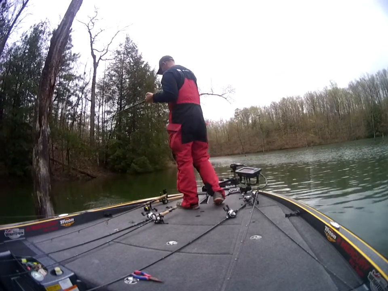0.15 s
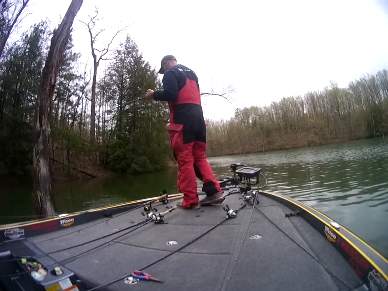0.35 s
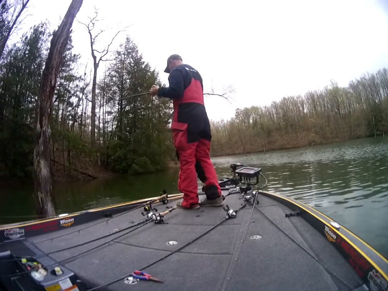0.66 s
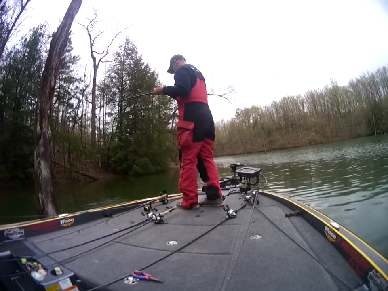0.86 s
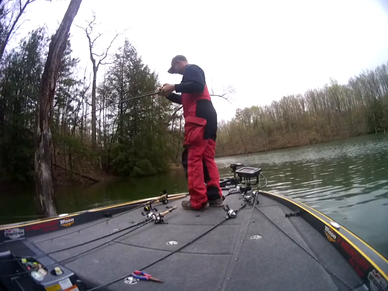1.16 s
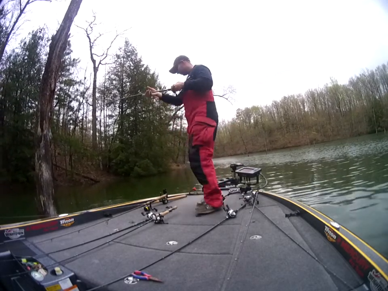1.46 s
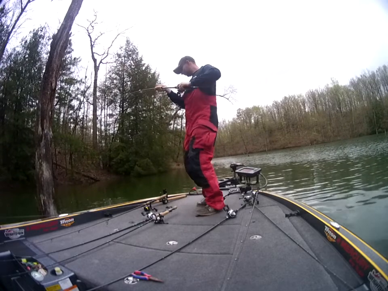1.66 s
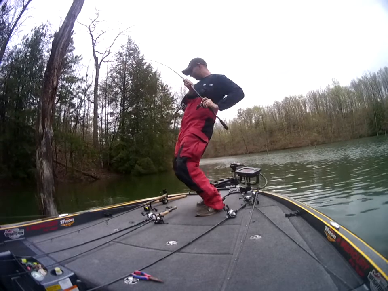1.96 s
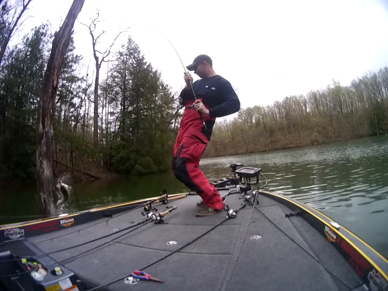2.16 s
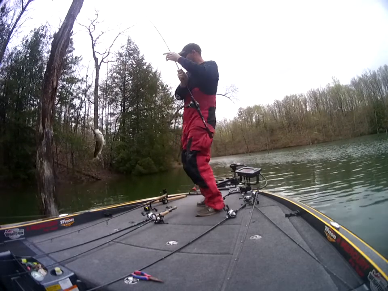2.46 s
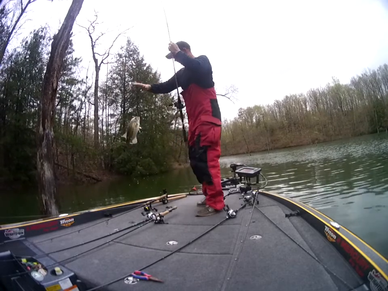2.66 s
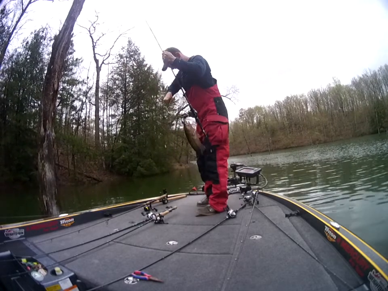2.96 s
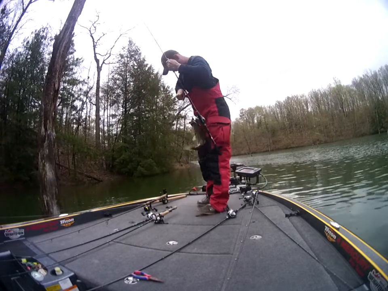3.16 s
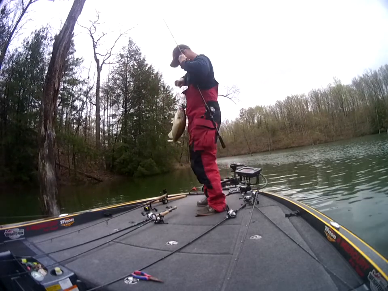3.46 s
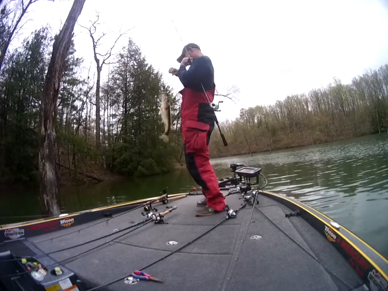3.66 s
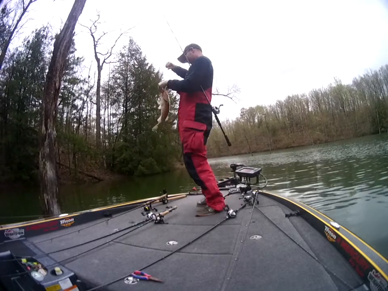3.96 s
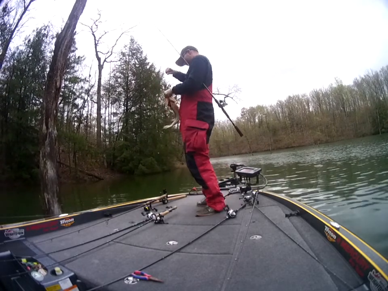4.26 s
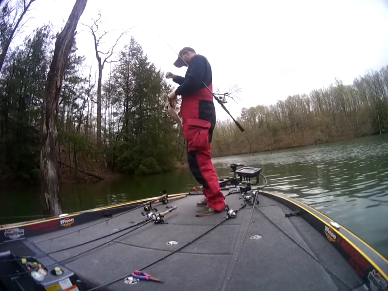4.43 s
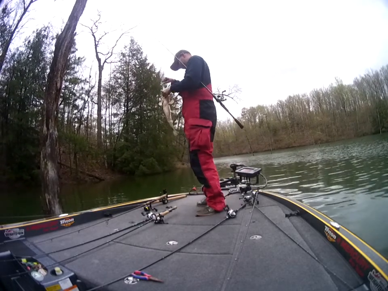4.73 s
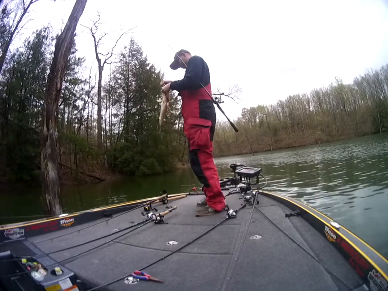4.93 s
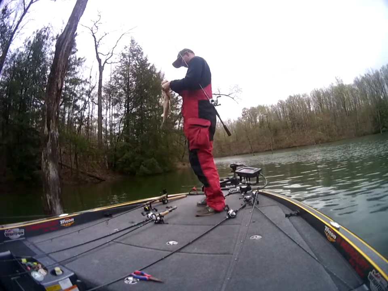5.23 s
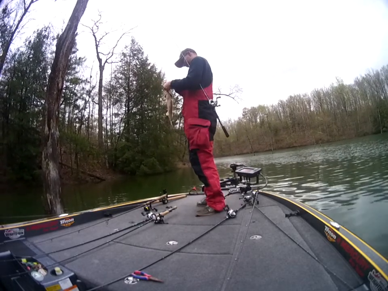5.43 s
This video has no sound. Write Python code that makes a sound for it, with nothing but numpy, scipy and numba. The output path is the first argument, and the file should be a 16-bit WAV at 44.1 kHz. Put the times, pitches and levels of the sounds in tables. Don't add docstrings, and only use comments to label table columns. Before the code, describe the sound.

A small mono camera microphone on a boat picks up a quick bird trill, then dense wet splashes with gurgles and droplets peaking after one second. A reel creaks just before two seconds, clear whistles sound across the water, a smaller splash and some dull flapping thumps follow. The end is quieter: chirps, thin leaf hiss and soft rumbling gusts.

```python
import sys
import numpy as np
from scipy import signal
from scipy.fft import rfft, irfft
from scipy.io import wavfile
from scipy.ndimage import uniform_filter1d
from numba import njit

SR = 44100
rng = np.random.default_rng(int(sys.argv[2]) if len(sys.argv) > 2 else 0)


def gain_from_db(level_db):
    decades = np.asarray(level_db, float) / 20
    return 10 ** decades


def to_wav(s):
    ch = np.atleast_2d(s).T
    pcm = np.round(np.clip(ch, -1, 1) * 32767)
    wavfile.write(sys.argv[1], SR, pcm.astype(np.int16))


N = 246498
T = np.arange(N) / SR


def unit(x):
    return x / np.sqrt(np.mean(x ** 2, axis=-1, keepdims=True))


def peak(x):
    return x / np.abs(x).max(axis=-1, keepdims=True)


def band(x, lo_hz, hi_hz, order=2):
    sos = signal.butter(order, [lo_hz, min(hi_hz, .45 * SR)], "band", fs=SR, output="sos")
    return signal.sosfilt(sos, x)


def ring(x, hz, t60):
    pole = np.exp((2j * np.pi * hz - np.log(1000) / t60) / SR)
    return signal.lfilter([1], [1, -pole], x).imag


def add(out, s, sound):
    i = max(int(s * SR), 0)
    out[i:i + len(sound)] += sound[:N - i]


def walk(rate):
    hold = int(SR / rate)
    steps = np.repeat(rng.standard_normal(N // 50), hold)[:N]
    return 1.3 * uniform_filter1d(uniform_filter1d(steps, hold), hold)


@njit
def grains(gap, hz, size, cycles, glide):
    out, at = np.zeros(N + 4000), 0.
    for k in range(len(gap)):
        at += gap[k]
        if at >= N:
            break
        phase, level, fade = 0., size[k], np.exp(-hz[k] / SR / cycles)
        for i in range(min(int(5 * cycles * SR / hz[k]), 4000)):
            phase += 2 * np.pi * hz[k] / SR * (1 + glide * i * hz[k] / SR / cycles)
            level *= fade
            out[int(at) + i] += level * np.sin(phase)
    return out[:N]


def drops(rate, lo_hz, hi_hz, cycles, scatter_db, glide):
    wait, pitch, size = rng.random((40000, 3)).T
    gap = -np.log(wait) * SR / rate
    hz = lo_hz * (hi_hz / lo_hz) ** pitch
    return unit(grains(gap, hz, gain_from_db(-scatter_db * np.log(size)), cycles, glide))


def collapse(table, ms):
    out, t = np.zeros(N), T[:2600] * 1000
    rise_ms = .8 * ms
    burst = np.exp(-(np.maximum(t - rise_ms, 0) / (1.2 * ms)) ** 1.4)
    wash = gain_from_db(-14) * np.exp(-t / (4.0 * ms))
    fade = np.minimum(t / rise_ms, 1) ** 2 * (burst + wash)
    for (s, db, spray_db, hz), noise in zip(table, rng.standard_normal((len(table), 2, len(t)))):
        noise = noise * np.abs(noise) ** 0.513
        rush = peak(band(noise[0] * fade, .4 * hz, 2.2 * hz))
        body = rush + .55 * peak(ring(noise[0] * fade, hz, 12.0 / hz))
        spray = band(band(noise[1] * fade, 8100, 11000, order=1), 7000, 12500)
        add(out, s, gain_from_db(db) * (peak(body) + gain_from_db(spray_db) * peak(spray)))
    return out


def air_pockets(table, cycles):
    out, t = np.zeros(N), T[:3500]
    for (s, db, hz), noise in zip(table, rng.standard_normal((len(table), len(t)))):
        fade = (1 - np.exp(-t / 0.00147)) * np.exp(-(t * np.sqrt(hz * 1000) / cycles) ** 1.125)
        tone = np.sin(2 * np.pi * hz * t * (0.987 + 2.2 * t))
        rush = unit(band(noise, 0.422 * hz, 2.4 * hz))
        add(out, s, gain_from_db(db) * peak(fade * (tone + 0.438 * rush)))
    return out


def sing(rows, wobble_hz, warble_hz=0.):
    s, hz, db = rows
    at = slice(int(s[0] * SR), int(s[-1] * SR))
    t = T[at]
    edge = np.clip(np.minimum(t - s[0], s[-1] - t) / .004, 0, 1)
    wobble = wobble_hz * unit(uniform_filter1d(rng.standard_normal(N // 8), 60))[:len(t)]
    bend = (warble_hz + 0 * T)[at]
    phase = 2 * np.pi * np.cumsum(np.interp(t, s, hz) + wobble + bend) / SR
    out = np.zeros(N)
    add(out, s[0], np.sqrt(2) * edge * gain_from_db(np.interp(t, s, db)) * np.sin(phase))
    return out


def glides(table, wobble_hz, ends_db):
    out = np.zeros(N)
    for s, length, from_hz, to_hz, db in table:
        level = db + np.array([ends_db, 0, ends_db])
        out += sing((s + length * np.array([0, .5, 1]), np.linspace(from_hz, to_hz, 3), level), wobble_hz)
    return out


def leaves():
    # frequency in Hz, level in dB per Hz.
    trees = [(82, -29), (140, -8), (295, -5), (331, -3.5), (510, -2), (620, 0), (785, -0.5), (1010, 0.5),
             (4850, -9), (6500, -8.5), (7910, -15), (9070, -11), (15100, -14)]
    f = np.fft.rfftfreq(N, 1 / SR) + 1
    hz, db = np.transpose(trees)
    spectrum = rfft(rng.standard_normal(N)) * gain_from_db(np.interp(np.log(f), np.log(hz), db))
    swell = walk(0.97)
    hiss = np.zeros(N)
    for centre_hz in 70 * 2 ** np.arange(0, 8.1, .5):
        window = np.cos(np.pi / 2 * np.clip(2 * np.log2(f / centre_hz), -1, 1)) ** 2
        hiss += gain_from_db(0.285 * swell + 0.975 * walk(9)) * irfft(spectrum * window, N)
    return gain_from_db(-53) * unit(hiss)


def gusts():
    # peak time in seconds, level in dB, time to swell or sink by 10 dB in seconds.
    puffs = [(.06, -66, 0.07), (.23, -67.5, 0.36), (.39, -65.5, 0.01), (.69, -70.5, 0.13),
             (1.45, -70.5, .2), (1.81, -66, 0.2), (1.94, -72, 0.15), (2.15, -67, .08), (2.29, -68, 0.04),
             (2.43, -69, 0.04), (2.62, -65.5, 0.1), (2.79, -60.5, .07), (2.95, -65, 0.06),
             (3.15, -58, 0.02), (3.36, -58, .1), (3.52, -59.5, 0.05), (4.64, -61.5, 0.05), (4.72, -59, 0.1),
             (4.97, -59.5, 0.18), (5.03, -63, 0.02), (5.24, -62.5, 0.1), (5.37, -53, 0.08),
             (5.47, -63.5, 0.44), (5.56, -62, 0.42)]
    calm_db = -77
    levels_db = [np.maximum(db - 10 * np.abs(T - s) / swell_s, calm_db) for s, db, swell_s in puffs]
    buffet = unit(band(rng.standard_normal(N), 26, 105))
    return gain_from_db(np.max(levels_db, axis=0)) * gain_from_db(1.5 * walk(18)) * buffet


def churn():
    # time in seconds, effort in dB, share out of the water from 0 to 1.
    struggle = [(0, -51, 0.49), (.15, -62.5, 0.59), (0.82, -58, 0.61), (0.96, -54.5, 0.25),
                (1.07, -47, 0.33), (1.10, -41.5, 0.53), (1.15, -44, 0.77), (1.2, -40, 0.88),
                (1.28, -41.5, 0.74), (1.32, -39.5, 0.39), (1.345, -45, 0.17), (1.385, -38, 0.23),
                (1.42, -41.5, 0.13), (1.455, -41, 0.48), (1.57, -46, 0.28), (1.7, -48.5, 0.22),
                (1.78, -47, 0.54), (1.82, -47, 0.4), (1.92, -45.5, 0.62), (2.04, -49, 0.33),
                (2.28, -54.5, 0.43), (2.325, -45.5, 0.31), (2.4, -56.5, 0.48), (3.0, -65, 0.33),
                (3.37, -50, 0.53), (3.52, -56, 0.53), (3.66, -52, 0.63), (3.75, -68, 0.03)]
    s, effort_db, exposed = np.transpose(struggle)
    fizz_db = np.interp(T, s, effort_db, -90, -90)
    exposed = np.clip(np.interp(T, s, exposed), 0, 1)
    gurgle_db = fizz_db + 1 - 15.5 * exposed
    spray_db = fizz_db - 11 + 13 * exposed
    surge = walk(23.215)
    gurgle = gain_from_db(gurgle_db - 3 + 2.0 * walk(30)) * drops(1400, 400, 1350, 3.6, 1.9, .04)
    fizz = gain_from_db(fizz_db - 3.5 + 1.44 * surge + 0.34 * walk(41.08)) * drops(5500, 1550, 7580, 1.6, 2.6, 0.054)
    spray = gain_from_db(spray_db - 3 + 2.0 * surge + 1.8 * walk(45)) * drops(6000, 8200, 12500, 2.8, 2.6, 0.)
    return gurgle + fizz + spray


def trill():
    # time in seconds, level in dB.
    loudness = [(0, -58), (.08, -59), (.13, -63), (.25, -63), (.37, -54.5), (.42, -57), (.5, -56.5),
                (.6, -56), (.68, -53), (.83, -53), (.96, -61)]
    note = np.arange(24)
    vary = rng.standard_normal((24, 4)).T
    starts = -.009 + (.0402 + .00008 * note) * note
    levels_db = np.interp(starts, *np.transpose(loudness)) + vary[0]
    bends_hz = 35 * vary[1]
    ups_db = 2 * vary[2] - 1 - 6 * starts
    dips_db = -4 * np.abs(vary[3])
    out = np.zeros(N)
    for s, db, bend, up, dip in zip(np.maximum(starts, 0), levels_db, bends_hz, ups_db, dips_db):
        times = s + np.array([0, .006, .012, .017, .022, .030])
        arch_hz = bend + np.array([4880, 5250, 5610, 5630, 5440, 5520])
        out += sing((times, arch_hz, db + np.array([up - 3, up, 0, dip, -3, -7])), 90)
    return out


def chips():
    # start in seconds, length in seconds, first Hz, last Hz, level in dB.
    calls = [
        (3.879, 0.076, 8900, 8400, -63),
        (3.626, 0.03, 6200, 5700, -59.5),
        (4.833, 0.04, 6700, 6350, -57),
        (5.070, 0.017, 6250, 4850, -53.5),
        (5.186, .014, 6400, 7000, -61),
        (.924, 0.0128, 7600, 7300, -58),
    ]
    along = np.array([0, 1 / 3, 1])
    out = np.zeros(N)
    for s, length, from_hz, to_hz, db in calls:
        hz = from_hz + (to_hz - from_hz) * along
        out += sing((s + length * along, hz, db + np.array([-5, 0, -5])), 130)
    return out


def whistles():
    # start in seconds, length in seconds, pitch in Hz, level in dB.
    calls = [
        (2.228, 0.062, 2549, -59),
        (2.436, 0.062, 2550, -55.5),
        (2.656, 0.064, 2560, -52.5),
        (2.868, .03, 2560, -65),
    ]
    along = np.array([0, 1 / 3, 1])
    out = np.zeros(N)
    for s, length, hz, db in calls:
        hook_hz = hz - 110 * np.array([0, 0, .1, 1])
        out += sing((s + length * np.array([0, .4, .8, 1]), hook_hz, db + np.array([-4, 0, 0, -2])), 12)
        echo = sing((s + length + .13 * along, hz - 15 + 0 * along, db - 5.5 - 15 * along), 25)
        out += gain_from_db(2 * walk(60)) * echo
    return out


def buzzes():
    # start in seconds, length in seconds, top Hz, level in dB,
    # upper voice in dB re the lower, clear part in seconds.
    calls = [
        (2.428, 0.226, 6620, -66, -5, .05),
        (3.459, 0.11, 6883, -59, 2, .06),
        (3.611, 0.0214, 6750, -57, -15, .02),
        (3.88, 0.016, 6880, -57, -20, .02),
        (3.896, .02, 6500, -59, -20, 0),
        (3.917, 0.0326, 6620, -53, -20, .03),
        (3.95, 0.17, 6600, -59.5, -4, -.03),
        (4.318, 0.221, 6930, -56.5, -2, .07),
    ]
    along = np.array([0, 1 / 3, 1])
    wander = gain_from_db(2 * walk(45))
    turn = np.cumsum(88 + 12 * walk(20)) / SR
    out = np.zeros(N)
    for s, length, top_hz, level_db, upper_db, clear_s in calls:
        depth = np.clip((T - s - clear_s) / 0.078, .05, 1)
        warble_hz = 330 * depth * signal.sawtooth(2 * np.pi * turn, .7)
        throb = 1 - .45 * depth * np.cos(2 * np.pi * (turn + .1))
        times = s + length * along
        hz = top_hz - 2900 * max(length, .1) * along ** 1.5
        db = level_db + np.array([-0.5, 0, -8])
        lower = sing((times, hz, db), 50, warble_hz)
        upper = sing((times, .3 * hz + 6400, db + upper_db - 5 * along), 110)
        out += wander * throb * (lower + gain_from_db(2 * walk(60)) * throb * upper)
    return out


def birds():
    out = trill() + chips() + whistles() + buzzes()
    echo = unit(rng.standard_normal(9000) * np.exp(-T[:9000] / 0.064)) / np.sqrt(9000)
    return out + gain_from_db(-10) * signal.fftconvolve(out, echo)[:N]


def clicks():
    # start in seconds, peak in dB, bright part in dB re peak, ring in Hz.
    hits = [(0.6979, -35.5, 2.5, 5650), (0.7433, -31, 0, 4800), (1.765, -47.5, 9.5, 4000),
            (1.7715, -51, 9, 4000), (2.016, -49.5, 6, 4000), (1.7893, -39.5, -19, 1790),
            (1.9093, -25, -17.5, 1510), (1.9238, -29, 0, 1560), (2.0308, -44, -23, 1950),
            (2.1786, -37.5, -15.5, 3220), (2.2083, -37.5, -18, 1640), (2.237, -33, -15, 1400),
            (2.11, -44, -15, 800), (2.4347, -45.5, 10, 2590), (2.4434, -42, 4.5, 2570),
            (2.9488, -44, 3.5, 1630), (3.137, -45, 9, 1500), (3.1614, -24.5, -12, 1514),
            (3.166, -29.5, -9.5, 1300), (3.2717, -42.5, -6, 1530), (3.2844, -37, 3, 1640),
            (3.3248, -31, -11, 2000), (3.34, -30.5, -1.5, 1480), (3.3454, -29, -17, 2600),
            (3.3542, -29.5, 0, 1620), (3.5088, -42, 7.5, 2670), (3.5142, -32.5, -8, 4680),
            (3.5763, -43, -15, 1780), (3.6148, -37, -4.5, 1634), (3.684, -41, -22, 1500),
            (5.1324, -52, 8, 3040)]
    return collapse(hits, ms=1.9)


def cracks():
    # start in seconds, peak in dB, frequency in Hz, length in cycles.
    hits = [(.7435, -17.5, 5500, .7), (.7436, -20, 9300, 2), (.7437, -31, 2300, 4), (.7438, -28, 1300, 1.5),
            (.7437, -27, 14000, 2), (3.1609, -26, 2000, .6), (1.3149, -14, 12500, 3),
            (2.3535, -22, 5000, 1.6), (1.0895, -17, 1800, .6), (1.7905, -33, 2500, .7),
            (1.8335, -24, 2500, .8), (1.1752, -21, 6500, 1.5), (1.238, -26, 2500, .8),
            (1.2055, -29, 3000, 1), (1.3112, -16, 5000, 1.2), (1.3148, -5, 9300, 3.0),
            (1.3150, -11, 6300, 2.5), (1.3608, -19, 4500, 1.6), (1.9108, -28, 2000, 1.1),
            (2.3310, -27, 2000, .8), (2.3532, -20, 3000, .6), (3.1726, -21, 1500, .6),
            (3.3566, -23, 4500, .8)]
    out, t = np.zeros(N), T[:200]
    for s, db, hz, cycles in hits:
        pulse = np.sin(2 * np.pi * hz * t) * t * np.exp(-2.5 * t * hz / cycles)
        add(out, s, -gain_from_db(db) * peak(pulse))
    return out


def plops():
    # start in seconds, peak in dB, pitch in Hz.
    pockets = [(0.876, -43.5, 1524), (1.142, -42, 900), (0.919, -38.5, 1003), (0.934, -39.5, 838),
               (0.983, -39, 827), (2.122, -45, 1250), (1.02, -36, 784), (1.087, -30, 1083),
               (1.127, -43, 833), (1.297, -36, 585), (1.301, -27, 1361), (1.305, -27.5, 1145),
               (1.317, -32, 860.5), (1.338, -37.5, 588), (1.377, -39.5, 582), (1.398, -36.5, 575.4),
               (1.448, -29, 1139), (1.492, -41.5, 560), (.864, -41, 3435), (1.802, -43.5, 667),
               (1.908, -40.5, 1352), (1.993, -43, 404.7), (2.053, -46.5, 687), (2.122, -47, 560),
               (2.03, -46, 580), (2.3, -39, 1463), (2.315, -33.5, 986.6), (2.357, -33, 948),
               (2.413, -44, 1580), (2.452, -37, 1273)]
    return air_pockets(pockets, cycles=7.35)


def bubbles():
    # start in seconds, length in seconds, first Hz, last Hz, level in dB.
    rising = [
        (1.4575, .009, 3099.5, 4900, -38.5),
        (.889, .022, 1600, 1670, -49),
        (.943, .028, 820, 1150, -54),
        (.91, .025, 520, 680, -55),
        (1.0, .03, 440, 560, -49),
        (1.024, .022, 1050, 1500, -50),
        (1.03, .02, 750, 950, -48),
        (1.428, .02, 700, 900, -46),
        (1.562, .016, 1100, 900, -49),
    ]
    return glides(rising, wobble_hz=40, ends_db=-2.5)


def slaps():
    # start in seconds, peak in dB, spray in dB re peak, cavity in Hz.
    strokes = [(1.0008, -31, -25.5, 1900), (1.0755, -27.5, -31, 3950), (1.0877, -23, -29, 1730),
               (1.097, -25, -25, 3870), (1.129, -35, -12.5, 4870), (1.174, -24, -4.5, 6600),
               (1.188, -31, -3, 5000), (1.1964, -29, 1, 6560), (1.2042, -30.5, -1, 3110),
               (1.2351, -30.5, 5, 2900), (1.2594, -27.5, -10, 3270), (1.2764, -31, 0.5, 3200),
               (1.3008, -17.5, -13.5, 6650), (1.3103, -18.5, 1, 6580), (1.3575, -16.5, -2, 4120),
               (1.3634, -21, -9.5, 6600), (1.3762, -25, -2.5, 2270), (1.379, -21.5, -3, 2490),
               (1.3976, -41, 10, 1470), (1.4296, -25.5, 0, 3720), (1.4434, -25, -9.5, 6900),
               (1.4457, -17.5, -7, 5000), (1.498, -31.5, -12.5, 4500), (1.505, -33.5, 3, 2900),
               (1.5537, -35, 2.5, 1570), (1.5637, -36, -9, 2140), (2.3068, -35.5, -9.5, 3520),
               (2.3106, -33.5, -8, 1530), (2.3283, -28.5, -14, 1840), (2.351, -21.5, -4.5, 3380),
               (2.3561, -26.5, -2, 1835), (2.3595, -33, -1.5, 3500), (2.345, -37, -2.5, 5000)]
    return gain_from_db(-2.5) * collapse(strokes, ms=2.944)


def droplets():
    # peak time in seconds, peak in dB, frequency in Hz.
    landings = [(1.0768, -29.5, 3500), (1.0981, -30, 3700), (1.1347, -35.5, 9900), (1.1757, -25.5, 6330),
                (1.1791, -32, 8900), (1.2058, -28.5, 8900), (1.2175, -34, 8900), (1.2392, -24, 10500),
                (1.2716, -32, 3300), (1.2781, -31, 10200), (1.2885, -34, 9800), (1.303, -18, 6400),
                (1.3114, -18, 3980), (1.3402, -35.5, 6200), (1.361, -16, 6150), (1.3615, -17, 3960),
                (1.3659, -20, 9700), (1.377, -24.5, 4080), (1.3775, -23, 2190), (1.4094, -36.5, 3400),
                (1.431, -25.5, 9200), (1.4484, -18.5, 5070), (1.45, -20, 9000), (1.4815, -37, 3700),
                (1.5068, -28.5, 9700), (1.5168, -33.5, 5700), (1.5552, -32, 9600), (1.5637, -36.5, 9300),
                (1.5793, -43.5, 3900), (1.7732, -34, 9600), (1.7906, -38.5, 3200), (1.8846, -37, 3000),
                (1.9065, -33.5, 9300), (1.9142, -35.5, 6200), (1.9231, -30, 6230), (1.9265, -29.5, 3300),
                (1.9762, -38.5, 2800), (1.98, -39.5, 9300), (2.0317, -38.5, 4010), (2.143, -39, 9470),
                (3.1335, -43, 9100), (3.2865, -32.5, 9000), (3.3066, -41.5, 3100), (3.3093, -41.5, 4700),
                (3.3422, -34.5, 9000), (3.3572, -30.5, 5670), (3.5104, -35, 9160), (3.5152, -37, 4320),
                (3.5288, -43, 2900), (3.6135, -41.5, 8800)]
    out, t = np.zeros(N), T[:300] - T[150]
    for (s, db, hz), noise in zip(landings, rng.standard_normal((len(landings), len(t)))):
        tone = np.sin(2 * np.pi * hz * t) + 0.62 * unit(band(noise, .5 * hz, 1.77 * hz))
        swell = np.exp(-np.abs(t * np.sqrt(hz * 5000) / 3.2) ** 1.38)
        add(out, s + t[0], gain_from_db(db) * peak(tone * swell))
    return out


def gulps():
    # start in seconds, peak in dB, pitch in Hz.
    pockets = [(1.296, -41, 500), (1.353, -36.5, 433.6), (1.498, -50, 149.3), (1.515, -53, 145),
               (1.3, -53, 150), (1.36, -51, 185), (1.6, -57, 135), (1.68, -55, 210), (1.322, -42, 480),
               (1.415, -43, 480), (1.443, -42, 440), (1.462, -43, 560), (1.92, -42, 426.5),
               (2.304, -43.5, 308.4), (2.35, -36.5, 365.5), (3.164, -42, 520)]
    return air_pockets(pockets, cycles=4.5)


def squeal():
    # time in seconds, second partial in Hz, level in dB.
    course = [
        (1.710, 1930, -55),
        (1.718, 1925, -37.5),
        (1.728, 1960, -33.5),
        (1.733, 1910, -33.5),
        (1.737, 1910, -39),
    ]
    # multiple of the fundamental, level in dB.
    partials = [(1, -21), (2, 1.5), (3, -19), (4, -32), (5, -21.5)]
    s, hz, db = np.transpose(course)
    phase = np.pi * np.cumsum(np.interp(T, s, hz)) / SR
    tone = sum(gain_from_db(partial_db) * np.sin(k * phase) for k, partial_db in partials)
    return np.sqrt(2) * gain_from_db(np.interp(T, s, db, -120, -120)) * tone


def slips():
    # start in seconds, peak in dB, favoured mode in Hz, length in ms.
    creaks = [(1.7368, -33.5, 1870, 7.3), (1.745, -35.5, 1780, 8.3), (1.8267, -21, 2140, 9.66),
              (1.8319, -22.5, 2260, 2.15), (1.836, -23, 1740, 6.8), (1.8411, -22, 1930, 11.6),
              (1.843, -24, 2250, 9.3), (1.8556, -21.5, 2245, 11.6), (1.8595, -28.5, 1780, 8.2),
              (1.870, -22, 1490, 7.6), (1.8743, -29, 1930, 7.1)]
    # frequency in Hz, level in dB.
    modes = [(1240, 1), (1490, -4), (1780, -4), (1930, -8), (2150, -6.5), (2360, -12), (3050, -16.5),
             (4000, -7), (4800, -10.5), (5600, -9)]
    out, t = np.zeros(N), T[:2200]
    for (s, db, favoured_hz, ms), noise in zip(creaks, rng.standard_normal((len(creaks), len(t)))):
        chatter = noise * np.sin(np.pi * np.minimum(t * 1000 / ms, 1))
        frame = np.zeros(len(t))
        for hz, mode_db in modes:
            boost_db = 8 / (1 + ((hz - favoured_hz) / 150) ** 2)
            t60_s = .027 * min(1, 2400 / hz)
            frame += gain_from_db(mode_db + boost_db) * peak(ring(chatter, hz, t60_s))
        add(out, s, gain_from_db(db) * peak(frame))
    return out


def groans():
    # start in seconds, length in seconds, first Hz, last Hz, level in dB.
    locked = [(1.736, 0.0086, 1900, 1860, -38.5), (1.742, 0.0179, 1800, 1777, -39),
              (1.730, 0.019, 2360, 2397, -44.5), (1.737, 0.0182, 1251, 1277, -43),
              (1.829, 0.0261, 2390, 2330, -34.5), (1.835, 0.02026, 1255, 1215, -31.5),
              (1.856, .012, 1270, 1265, -29.5), (1.870, .013, 1310, 1240, -30.5),
              (1.843, 0.0138, 1530, 1500, -34.5), (1.856, 0.0108, 2000, 1880, -35.5),
              (1.855, 0.0208, 3900, 4000, -43.5), (1.829, 0.0162, 4100, 3980, -47),
              (1.765, 0.0304, 4670, 4700, -57.5)]
    return glides(locked, wobble_hz=30, ends_db=-3)


def thumps():
    # start in seconds, peak in dB, pitch in Hz.
    blows = [(3.1603, -27, 866), (3.1665, -33, 600), (3.1722, -27, 605), (3.288, -41, 1400),
             (3.268, -44, 1250), (3.582, -43, 800), (3.696, -44, 1400), (3.483, -45, 1300),
             (3.172, -23.5, 978.4), (3.247, -46, 1290), (3.3252, -35, 1450), (3.339, -30.5, 939),
             (3.344, -37, 854), (3.5095, -33.5, 1184), (3.555, -44.5, 1217), (3.591, -41.5, 1343),
             (3.616, -40, 1496), (3.621, -41, 1223)]
    return air_pockets(blows, cycles=3.8)


def scene():
    near = clicks() + cracks() + plops() + slaps() + thumps()
    near += band(squeal() + slips(), 1368, 12700, order=3)
    tail = band(rng.standard_normal(6000), 300, 6000, order=1) * np.exp(-T[:6000] / .014)
    reflected = gain_from_db(-13) * signal.fftconvolve(near, unit(tail) / np.sqrt(6000))[:N]
    water = band(near + reflected + churn(), 229.7, 20500, order=3)
    mono = leaves() + gusts() + birds() + water
    mono += bubbles() + droplets() + gulps() + groans()
    return np.array([mono, mono])


def low_pass(x):
    return signal.sosfilt(signal.butter(12, 16470, fs=SR, output="sos"), x)


def record(dry):
    f = np.fft.rfftfreq(N, 1 / SR)
    top_db = -45 * np.clip((f - 15150) / 900, 0, 1)
    colour = gain_from_db(top_db - 1.26 * np.exp(-((f - 7500) / 500) ** 2))
    hz, s, frames = signal.stft(irfft(rfft(dry) * colour, N), SR, nperseg=1024)
    at = np.minimum(s * SR, N - 1).astype(int)
    centre_hz = 7900 + 70 * walk(14)[at]
    width_hz = 150 * gain_from_db(2.5 * walk(20)[at])
    gap_db = -34 * np.exp(-((hz[:, None] - centre_hz) / width_hz) ** 2)
    split = signal.istft(frames * gain_from_db(gap_db), SR, nperseg=1024)[1][:, :N]
    return low_pass(split)


dry = scene()
out = record(dry)
to_wav(out)
```